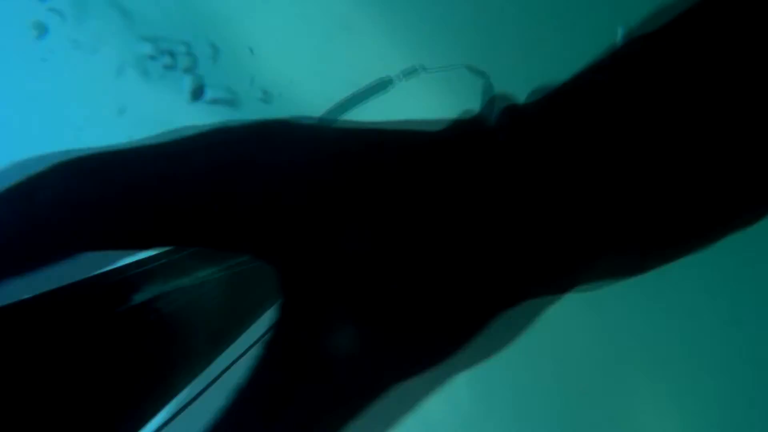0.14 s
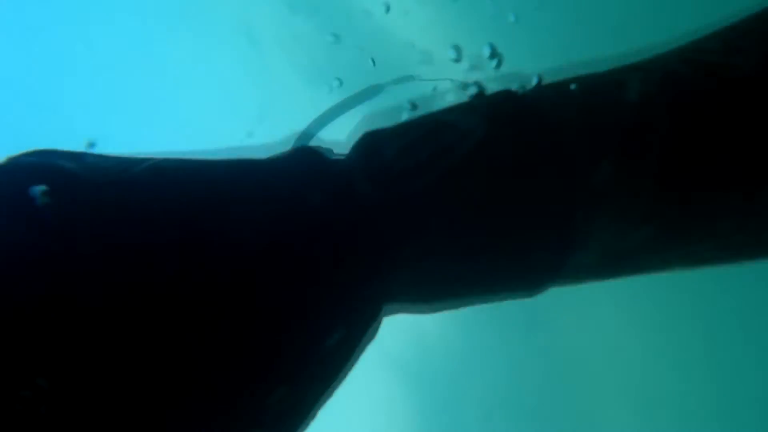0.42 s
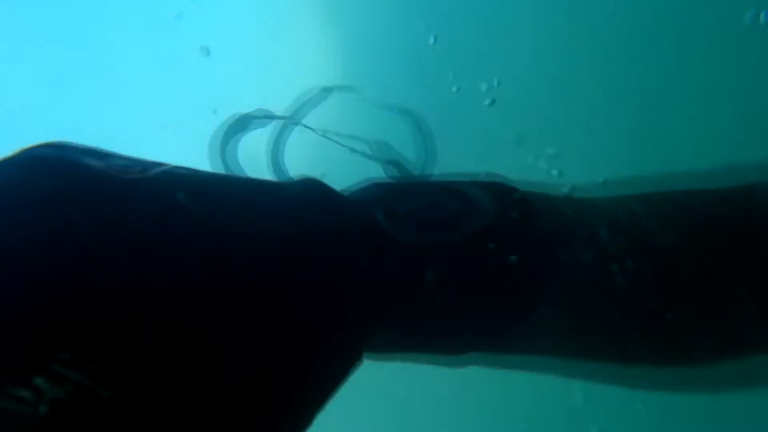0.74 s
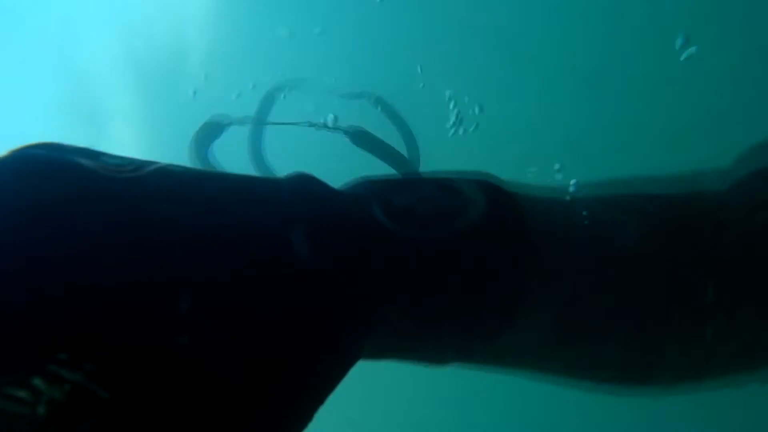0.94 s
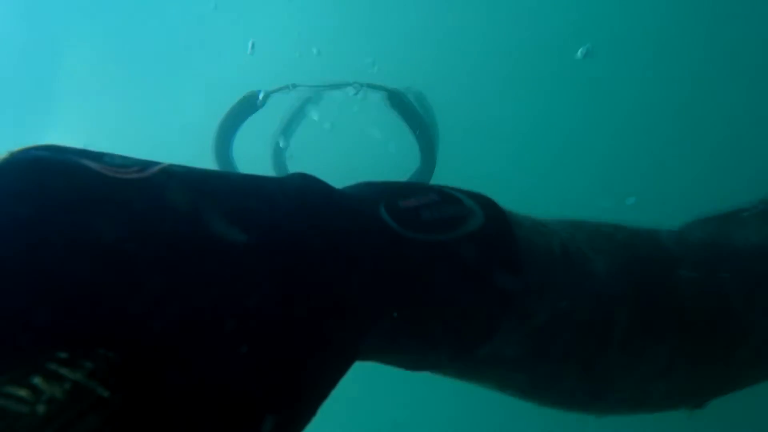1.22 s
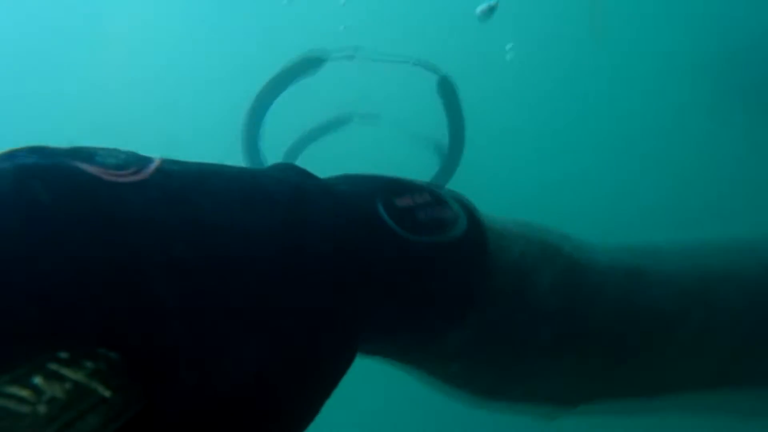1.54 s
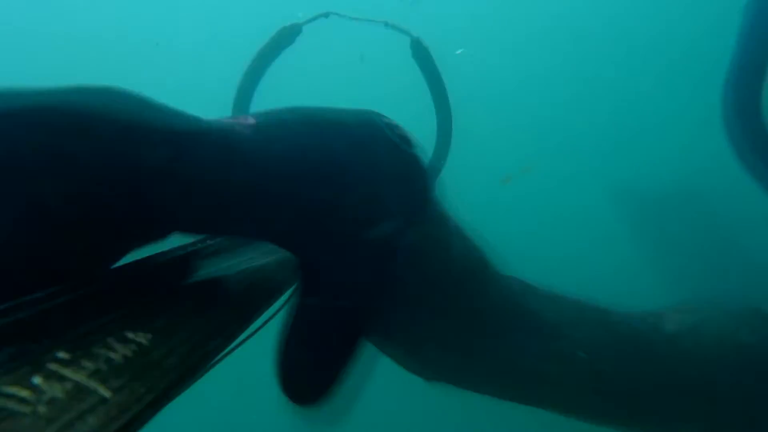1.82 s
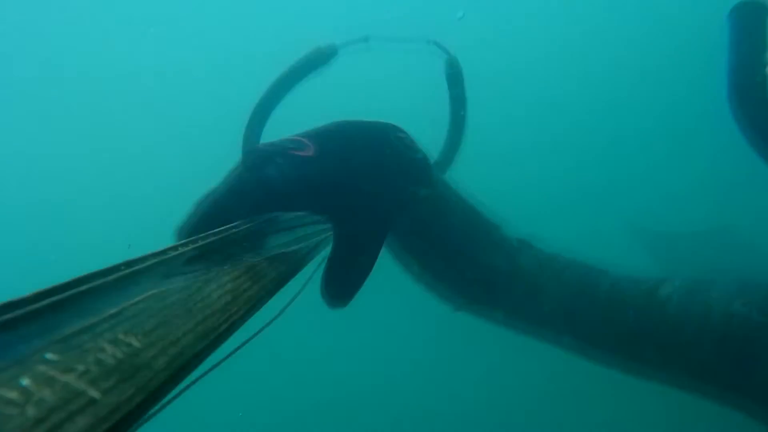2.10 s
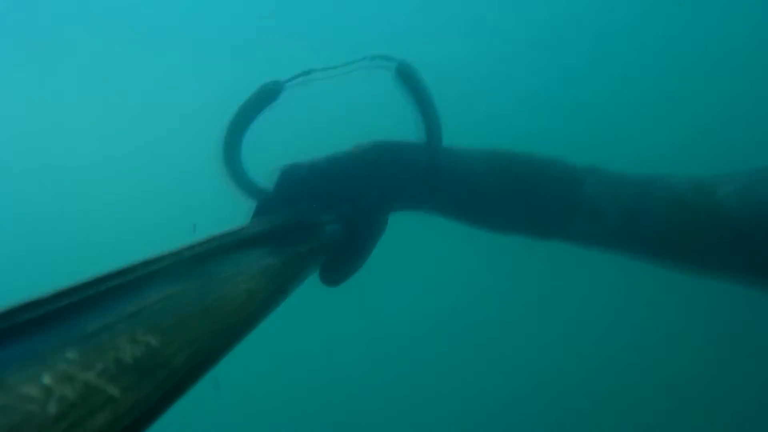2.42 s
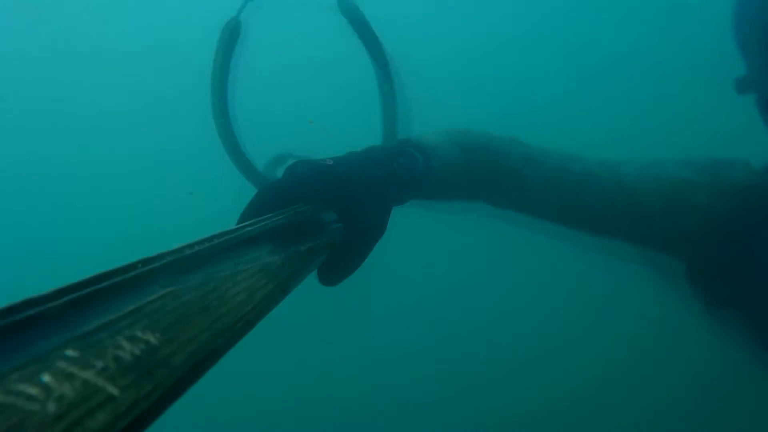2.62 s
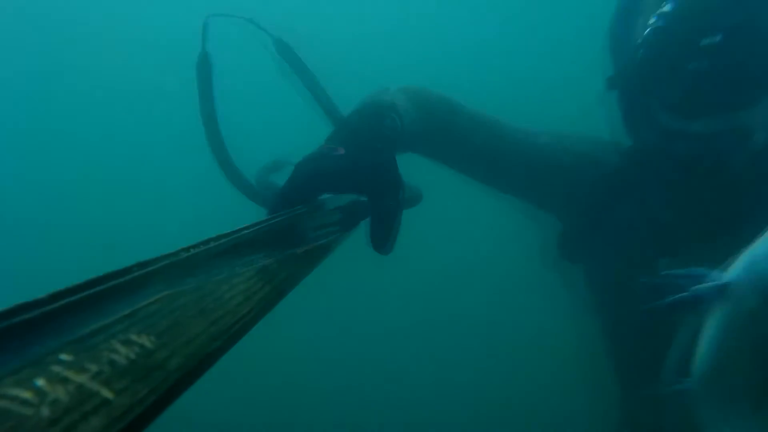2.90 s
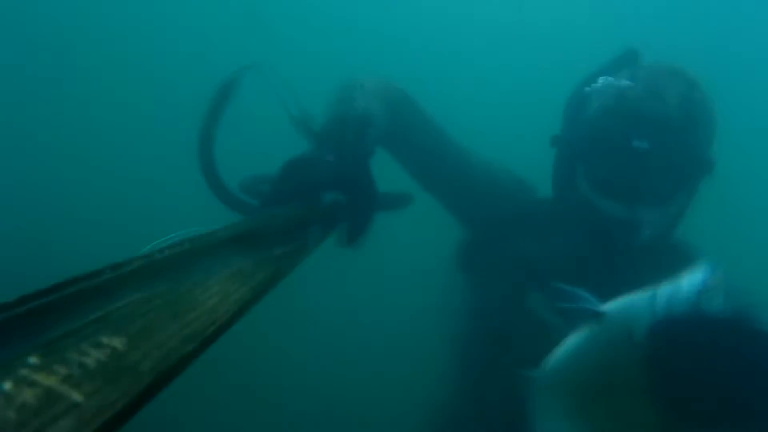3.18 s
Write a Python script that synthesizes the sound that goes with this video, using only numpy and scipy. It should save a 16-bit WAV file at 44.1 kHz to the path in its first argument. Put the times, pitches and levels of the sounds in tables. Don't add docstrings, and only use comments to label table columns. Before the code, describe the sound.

Muffled speargun knocks and thuds under water, picked up very close by a microphone in a sealed case; soft glove bumps first, a sudden double knock, quiet again, then rapid hard blows cut off while still ringing.

```python
import sys
import numpy as np
from scipy import signal
from scipy.fft import rfft, irfft
from scipy.io import wavfile

SR = 44100
rng = np.random.default_rng(int(sys.argv[2]) if len(sys.argv) > 2 else 0)


def decibels_to_gain(level_db):
    exponent = np.asarray(level_db, float) / 20
    return 10 ** exponent


def store_pcm(level_fs):
    pcm = np.round(np.clip(level_fs, -1, 1) * 32767).astype(np.int16)
    wavfile.write(sys.argv[1], SR, np.atleast_2d(pcm).T)


N = 147735

# time [s], shaft, sway, barrel and mount level [dB].
PUSHES = [
    (.94, -51, -49.5, -51.5, -75),
    (2.4347, -27, -36.5, -36.5, -33.5),
    (2.474, -43.5, -45, -38.5, -56),
    (3.135, -50, -37, -38, -41),
    (3.148, -40, -34, -39.5, -46),
    (3.2701, -24.5, -46, -38, -27.5),
    (3.2797, -24, -50, -23.5, -30.5),
    (3.299, -34, -44, -45, -38),
]
# time [s], shaft, sway, barrel and mount level [dB].
PULLS = [(.526, -49, -50, -60, -66), (.663, -44.5, -52.5, -58, -48.5), (.845, -52, -55, -61, -72),
         (.956, -41, -50.5, -52.5, -53), (1.635, -49.5, -60, -61, -55), (3.128, -48.5, -38, -42, -30),
         (3.17, -35.5, -44, -43, -43), (3.185, -52, -54, -41, -51), (3.285, -29, -48, -33.5, -41),
         (3.294, -34, -52, -35, -28.5), (3.324, -55, -54, -37, -51)]
# time [s], body level [dB], edge level [dB], lean to upper wall modes [dB/octave].
KNOCKS = [(.029, -60, -65, .1), (.055, -61, -71, 9), (.268, -58, -89, -9), (.526, -53.5, -82, 4),
          (.545, -59, -78, -5), (.662, -52, -79, -13), (.782, -59, -64, 9), (.845, -56.5, -68, 8),
          (.953, -49.5, -81, -5), (.962, -52, -73, -5), (1.136, -75, -68.5, .1), (2.377, -65.5, -82, -45),
          (2.402, -59, -78, .1), (2.494, -52, -62, .1), (2.51, -55, -72, -2), (2.548, -64, -67, 3),
          (2.633, -58, -72, 8), (2.691, -58, -72, -11), (3.049, -60.5, -64, 7)]
# time [s], body level [dB], edge level [dB], lean [dB/octave].
LOUD_KNOCKS = [(2.434, -33, -60, .1), (2.456, -47, -58.5, .1), (2.4635, -35, -68, 18),
               (3.128, -37.5, -49.5, .1), (3.145, -46, -77, .1), (3.169, -43, -62.5, .1),
               (3.175, -65, -70, .1), (3.186, -44.5, -70, .1), (3.252, -50, -74, .1),
               (3.27, -31.5, -48.5, .1), (3.2715, -33.5, -67, 0.079), (3.279, -26.5, -50.5, .1),
               (3.286, -32, -63, 0.088), (3.291, -51, -56, 0.12), (3.299, -46, -66, .1),
               (3.306, -47, -65, .1), (3.316, -57, -70, .1), (3.324, -52, -73, 0.07)]
# time [s], shaft, sway and barrel level [dB].
BUMPS = [(0.012, -51, -64, -54), (0.035, -45.5, -52, -49.5), (0.057, -55, -60, -51),
         (0.272, -51.5, -54, -54.5), (0.384, -52, -52, -49.5), (0.545, -52, -60, -50),
         (0.681, -48.5, -55.5, -47), (0.873, -79.5, -49, -52.5), (1.186, -61.5, -52, -66),
         (1.259, -55, -54.5, -52.5), (1.608, -68, -59.5, -59), (1.695, -48, -61, -56),
         (1.984, -70, -59, -59.5), (2.291, -57.5, -70, -64), (2.375, -56, -66, -61),
         (2.402, -53, -45.5, -50.5), (2.517, -40, -36.5, -56), (2.611, -46.5, -43, -77),
         (2.698, -57, -52, -54.5), (3.044, -55, -75, -81), (3.087, -64, -63, -59.5)]
# time [s], level [dB].
HANDLING = [(0, -61), (.3, -57), (.54, -56), (.7, -57.5), (1.0, -58.5), (1.15, -53), (1.46, -63),
            (1.9, -60), (2.1, -63.5), (2.36, -62), (2.56, -48.5), (2.7, -61), (2.9, -60), (3.079, -70),
            (3.17, -45), (3.251, -37.5), (3.35, -37)]
TREMBLE_DB = (-2, -10.5, -13.5, -23.5, -27.5)

# frequency [Hz], level [dB], t60 [s].
SWAY = [(26.9, -6.5, 0.69), (31.7, 4.5, 0.34)]
# frequency [Hz], level [dB], t60 [s].
BARREL = [(71.4, -1, 0.16), (90.85, 3.5, 0.15), (110.6, -8, 0.17)]
# frequency [Hz], level [dB], t60 [s].
SHAFT = [(173.9, 0.5, 0.15), (197.9, -9.5, 0.23)]
# frequency [Hz], level [dB], t60 [s].
MOUNT = [(278, -3, 0.046), (342.4, -7, 0.048), (407, -14, 0.066), (575, -8, 0.013)]
# frequency [Hz], level [dB], t60 [s].
HOUSING = [(683, -18, 0.049), (830, -8.5, 0.014), (1069, -9, 0.027), (1164, -13.5, 0.027),
           (1322, -10, 0.025), (1480, -25.5, 0.011)]
# frequency [Hz], level [dB], t60 [s].
EDGES = [(1990, -16, 0.022), (2610, -7, 0.0058), (3350, -8.5, 0.0088), (3730, 0.5, 0.0045),
         (4370, -8, 0.0094), (4836, -6, 0.0094)]
# frequency [Hz], level [dB].
HISS = [(150, -19), (250, -0.5), (572, -4.5), (624, -4), (897, -5), (1400, -7.5), (2130, -7), (13000, -12),
        (15500, -10.5)]

STRIKE_SPREAD_DB = 4
BLOW_SOFT_HZ, BUMP_SOFT_HZ, SWAY_SOFT_HZ = 1410, 252, 118
BUMP_MOUNT_DB = -12
COUPLING_HZ, COUPLING_WIDTH_HZ, COUPLED_DB, DIRECT_DB = 198, 106, -1.5, -12
KNOCK_LAG_S, EDGE_DB = 0.0005, 6.5
RUBS_PER_S, RUB_SPREAD_DB = 250, 2
HISS_DB = -68


def rms_one(x):
    return x / np.sqrt(np.mean(x ** 2) + 1e-20)


def butterworth(x, order, hz, kind="low"):
    return signal.sosfilt(signal.butter(order, hz, kind, fs=SR, output="sos"), x)


def ring(force, hz, t60_s):
    r = decibels_to_gain(-60 / (t60_s * SR))
    w = 2 * np.pi * hz / SR
    return signal.lfilter([0, np.sin(w)], [1, -2 * r * np.cos(w), r * r], force + 1e-18)


def strike(modes, s, db, direction, spread_db, lean_db=0):
    out = 0
    spread = rng.standard_normal((len(s), len(modes)))
    sample = np.clip(s * SR, 0, N - 1).astype(int)
    for k, (hz, level_db, t60_s) in enumerate(modes):
        strength_db = db + level_db + spread_db * spread[:, k] + lean_db * np.log2(hz / 1000)
        force = np.zeros(N)
        np.add.at(force, sample, direction * decibels_to_gain(strength_db))
        out = out + ring(force, hz, t60_s)
    return out


def soften(x, hz):
    r = np.exp(-2 * np.pi * hz / SR)
    return signal.lfilter([(1 - r) ** 2], [1, -2 * r, r * r], x)


def swell(x):
    r = np.exp(-np.pi * COUPLING_WIDTH_HZ / SR)
    w = 2 * np.pi * COUPLING_HZ / SR
    seat = signal.lfilter(np.array([1, 0, -1]) * (1 - r * r) / 2, [1, -2 * r * np.cos(w), r * r], x)
    return decibels_to_gain(COUPLED_DB) * seat + decibels_to_gain(DIRECT_DB) * x


def gun(s, shaft_db, sway_db, barrel_db, mount_db, direction, spread_db):
    mount = butterworth(strike(MOUNT, s, mount_db, direction, spread_db), 2, 576)
    sway = soften(strike(SWAY, s, sway_db, direction, spread_db), SWAY_SOFT_HZ)
    barrel = strike(BARREL, s, barrel_db, direction, spread_db)
    shaft = swell(strike(SHAFT, s, shaft_db, direction, spread_db))
    return sway + barrel + shaft + mount


def blows():
    pushes = gun(*np.transpose(PUSHES), direction=1, spread_db=2.0)
    pulls = gun(*np.transpose(PULLS), direction=-1, spread_db=0.76)
    return soften(pushes + pulls, BLOW_SOFT_HZ)


def knocks():
    s, body_db, edge_db, lean_db = np.transpose(list(KNOCKS) + list(LOUD_KNOCKS))
    s = s + KNOCK_LAG_S
    direction = rng.choice([-1, 1], len(s))
    wall = strike(HOUSING, s, body_db, direction, 0.81, lean_db)
    wall = butterworth(wall, 2, (770, 1390), "band")
    edges = strike(EDGES, s, edge_db + EDGE_DB, direction, STRIKE_SPREAD_DB)
    edges = butterworth(edges, 2, 1600, "high")
    return wall + butterworth(edges, 8, 5000)


def bumps():
    s, shaft_db, sway_db, barrel_db = np.transpose(BUMPS)
    direction = rng.choice([-1, 1], len(s))
    contacts = gun(s, shaft_db, sway_db, barrel_db, shaft_db + BUMP_MOUNT_DB, direction, STRIKE_SPREAD_DB)
    return soften(contacts, BUMP_SOFT_HZ) * decibels_to_gain(-2)


def trembling():
    out = 0
    for modes, share_db in zip((SWAY, BARREL, SHAFT, MOUNT, HOUSING), TREMBLE_DB):
        happens = rng.random(N) < RUBS_PER_S / SR
        strength = decibels_to_gain(RUB_SPREAD_DB * np.minimum(rng.exponential(1, N), 4))
        rubs = happens * strength * rng.choice([-1, 1], N)
        stirred = sum(decibels_to_gain(level_db) * ring(rubs, hz, t60_s) for hz, level_db, t60_s in modes)
        out = out + decibels_to_gain(share_db) * rms_one(stirred)
    s, db = np.transpose(HANDLING)
    return out * decibels_to_gain(np.interp(np.arange(N) / SR, s, db))


def hiss():
    hz, db = np.transpose(HISS)
    bin_hz = np.arange(N // 2 + 1) * SR / N
    colour = decibels_to_gain(np.interp(np.log(bin_hz + 1), np.log(hz), db))
    return decibels_to_gain(HISS_DB) * rms_one(irfft(rfft(rng.standard_normal(N)) * colour, N))


def scene():
    return (blows() + knocks() + bumps() + trembling() + hiss())[None, :]


def roll_off(x):
    return signal.sosfilt(signal.butter(12, 15620, fs=SR, output="sos"), x)


def record(dry):
    x = butterworth(dry, 1, 12, "high")
    x = signal.sosfilt(signal.cheby2(12, 60, 15700, fs=SR, output="sos"), x)
    return roll_off(x)


dry = scene()
out = record(dry)
store_pcm(out)
```